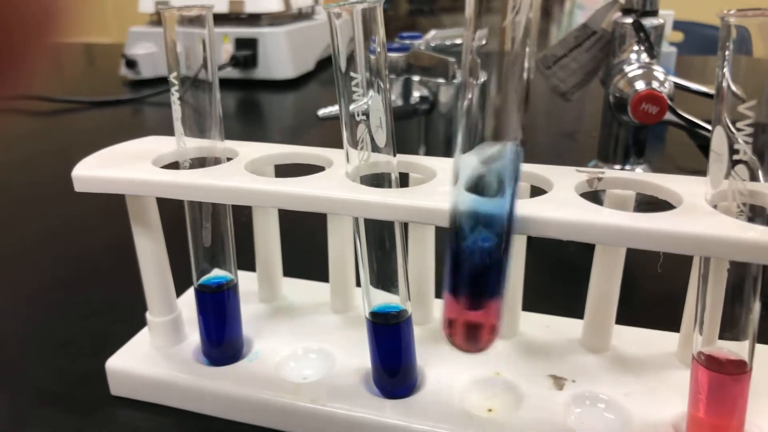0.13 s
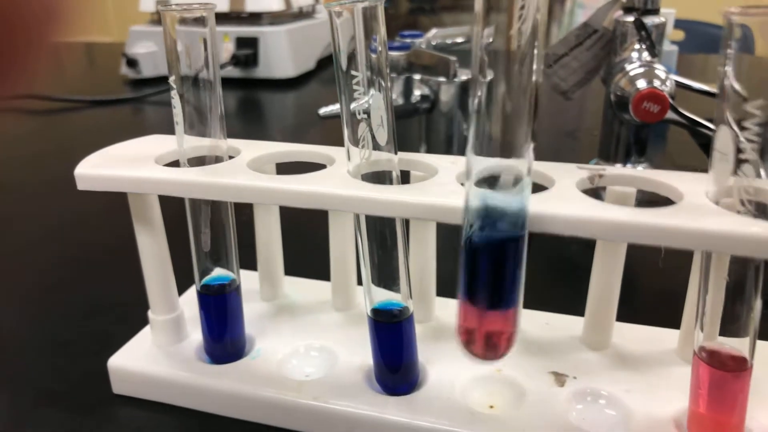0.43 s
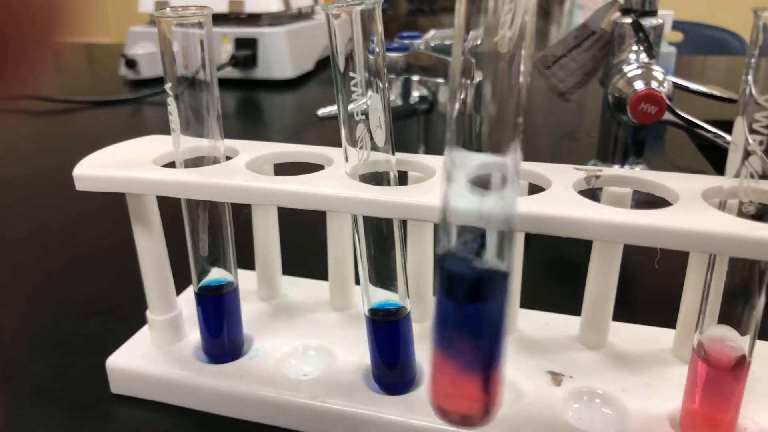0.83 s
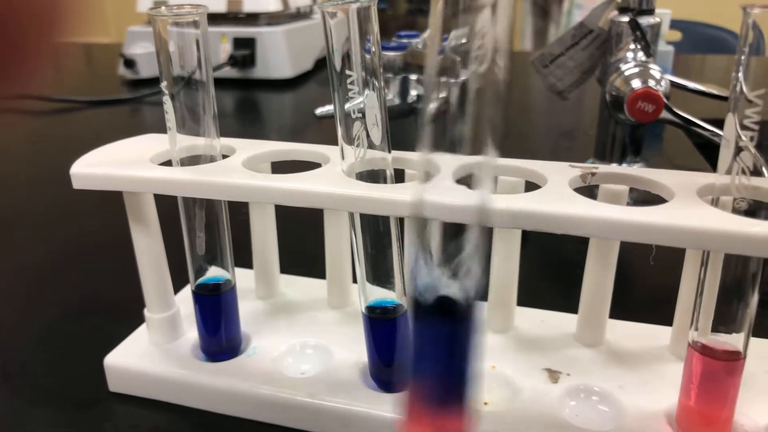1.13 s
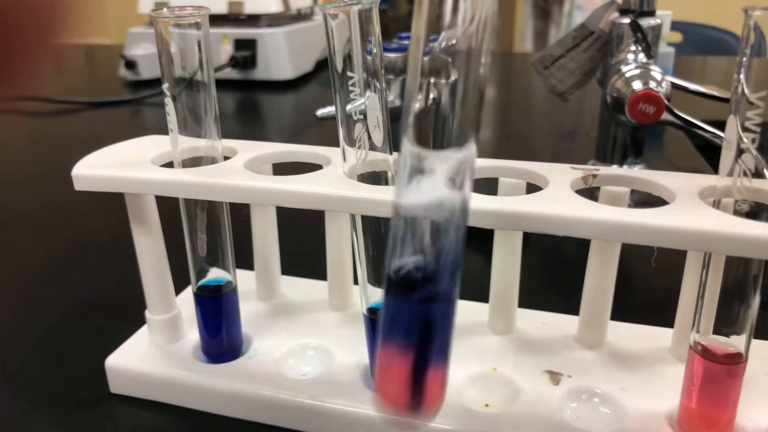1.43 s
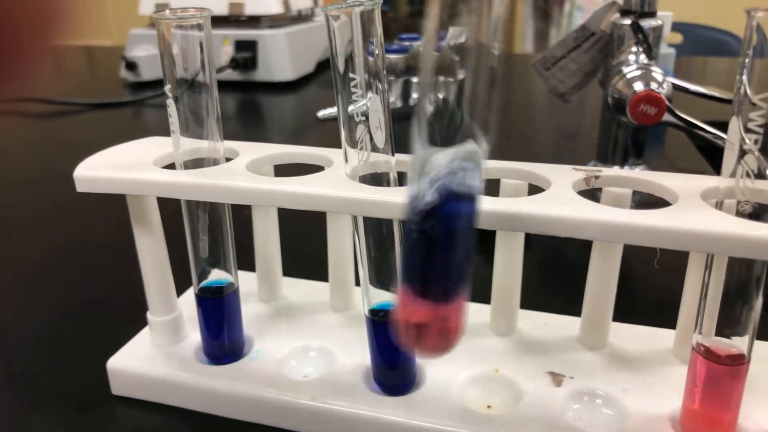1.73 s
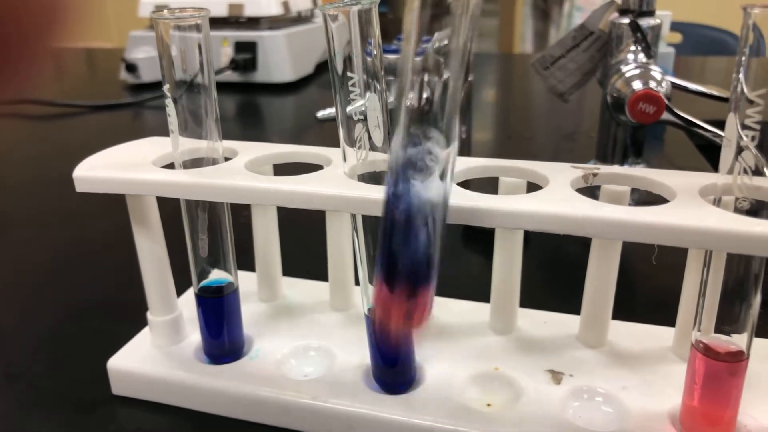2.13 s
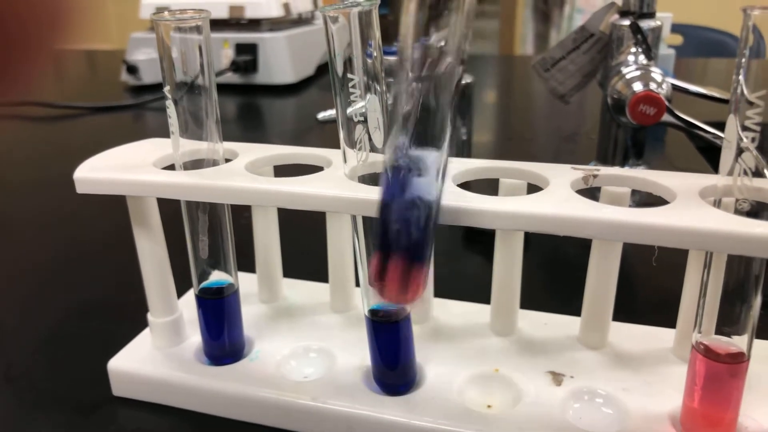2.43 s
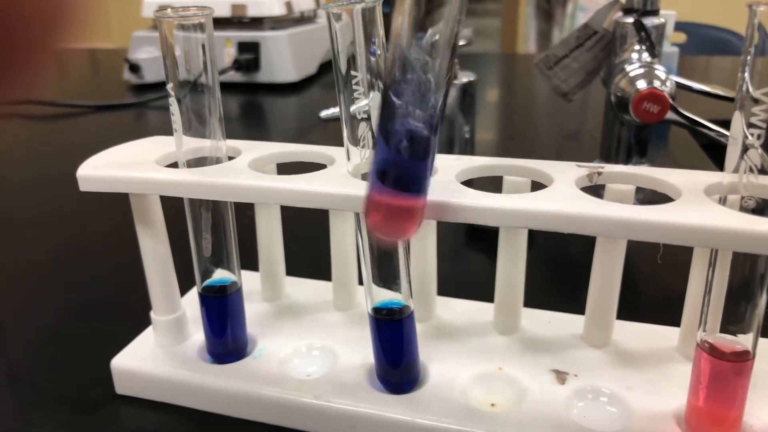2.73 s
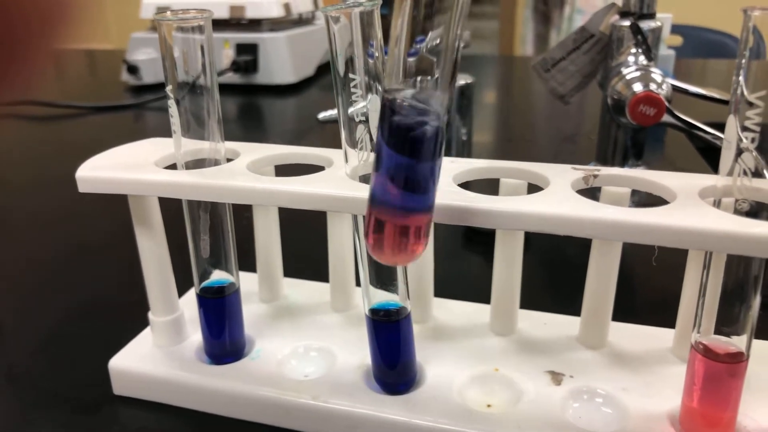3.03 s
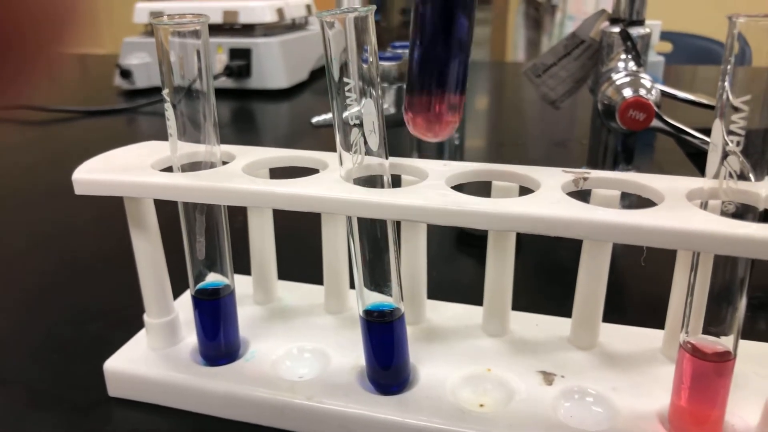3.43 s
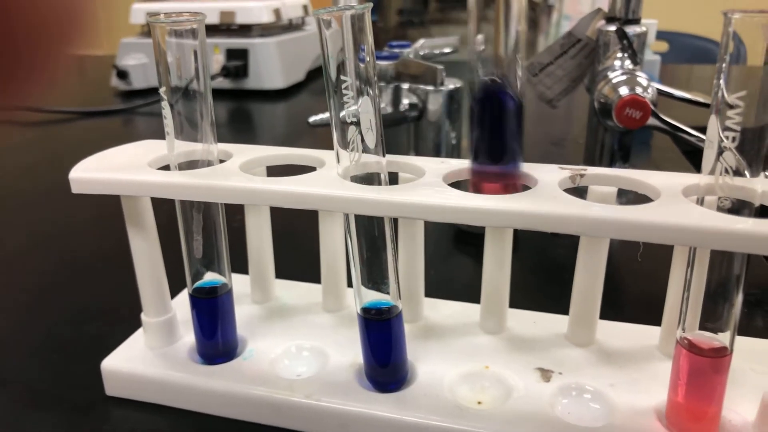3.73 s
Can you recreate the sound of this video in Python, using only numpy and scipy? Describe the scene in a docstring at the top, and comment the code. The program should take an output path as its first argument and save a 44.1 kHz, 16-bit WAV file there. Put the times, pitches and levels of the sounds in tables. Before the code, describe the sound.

A quick burst of glass-on-plastic clatter in the first second, fading into steady lab hum

```python
"""Glass test tube shaken in a plastic rack

Strokes up and down: the first hit the rack, later ones only graze it. Mains hum and ventilation fill the lab.
Glass: noise crack plus damped bending modes. Rack: spreading noise clack plus modes, then rattles on the bench.
Bench: low modes. Grazes: narrow noise ticks. Room: decaying noise tail. Background: sines and coloured noise."""
import sys
import numpy as np
from scipy import signal
from scipy.fft import rfft, irfft, next_fast_len
from scipy.io import wavfile
from scipy.ndimage import uniform_filter1d, map_coordinates

SR = 44100
rng = np.random.default_rng(int(sys.argv[2]) if len(sys.argv) > 2 else 0)


def wrap_up_sound(samples):
    """Save the sound to the file named by the first command line argument, as 16-bit audio."""
    columns = np.atleast_2d(samples).T
    # keep every value between -1 and 1, then stretch to whole-number steps
    tamed = np.clip(columns, -1, 1)
    steps = np.round(tamed * 32767).astype(np.int16)
    wavfile.write(sys.argv[1], SR, steps)


N = 171990  # samples


def amp(db):
    """Decibels to gain."""
    return 10 ** (np.asarray(db) / 20)


def along(points, hz):
    """(f/Hz, value) points interpolated on a log frequency axis."""
    f, v = np.transpose(points)
    return np.interp(np.log(hz + 1), np.log(f + 1), v)


def below(hz, edge_hz):
    """Soft step: near 1 well under the edge, 1/2 at it, near 0 well over it."""
    return 1 / (1 + (hz / edge_hz) ** 4)


def filtered(x, response):
    """Multiply the spectrum of x by a response of frequency."""
    m = next_fast_len(len(x) + 8192)
    hz = np.fft.rfftfreq(m, 1 / SR)
    return irfft(rfft(x, m) * response(hz), m)[:len(x)]


def coloured(x, gain_db):
    """Causal minimum-phase filter with a gain in dB as a function of frequency."""
    m = 2 * len(x)
    cepstrum = irfft(np.log(amp(gain_db(np.fft.rfftfreq(m, 1 / SR)))))
    # fold the cepstrum onto positive time
    cepstrum[1:m // 2] *= 2
    cepstrum[m // 2 + 1:] = 0
    return irfft(rfft(x, m) * np.exp(rfft(cepstrum)))[:len(x)]


def evened(x, size=400):
    """Flatten the broad chance peaks of a noise burst's spectrum."""
    z = rfft(x, 2 * len(x))
    power = np.abs(uniform_filter1d(np.abs(z) ** 2, 2 * size))
    return irfft(z / np.sqrt(power + 1e-12))[:len(x)]


def hit_time():
    """Time axis of one contact, s."""
    return np.arange(16384) / SR


def blow(x):
    """Scale to the energy of 24 ms at unit RMS."""
    return x * np.sqrt(.024 * SR / (np.sum(x ** 2) + 1e-20))


def dying(t60s, order=128):
    """Noise in which each frequency decays at its own rate; t60s: f/Hz, t60/s."""
    t = hit_time()
    hz, s, z = signal.stft(rng.standard_normal(len(t)), SR, nperseg=order)
    decay = amp(-60 * s / along(t60s, hz)[:, None])
    noise = signal.istft(z * decay, SR, nperseg=order)[1]
    return evened(noise[:len(t)], size=160)


def wobble(rate, size=N):
    """Smooth random curve, rate knots/s."""
    knots = rng.standard_normal(256)
    return map_coordinates(knots, [np.arange(size) * rate / SR], mode="mirror")


def add(track, s, sound):
    """Mix a sound in at s seconds."""
    part = track[round(s * SR):][:len(sound)]
    part += sound[:len(part)]


RISE_CYCLES, SCATTER_DB = 2, 1  # build-up time constant; level spread of a mode per blow


def ring(modes, delay=lambda hz: 0, tilt_db=lambda hz: 0, length=1):
    """Damped modes building up over a few cycles, level and phase random at each blow."""
    out = 0
    draws = rng.standard_normal((len(modes), 2))
    for (hz, db, t60), (size, phase) in zip(modes, draws):
        t = np.maximum(hit_time() - delay(hz), 0)
        decay = amp(-60 * t / (t60 * length))
        rise = 1 - np.exp(-t * hz / RISE_CYCLES)
        wave = np.sin(2 * np.pi * (hz * t + phase)) * decay * rise
        out = out + amp(db + SCATTER_DB * size + tilt_db(hz)) * blow(wave)
    return out


# tube meets rack: t/s, crack level/dB, rack level/dB, low body boost/dB,
# low, high and top glass ring level/dB, ring t60 factor/x
TUBE_STRIKES = [(0.1023, -49.5, -42, 3, -82, -61.5, -86, 1),
                (0.2173, -28.5, -23.5, -0.5, -40.5, -36, -54, 0.84),
                (0.3914, -32, -26.5, -3, -55, -37, -56, 1.2),
                (.5306, -27.5, -23.5, -1, -43, -36.5, -57, .7),
                (0.5408, -38, -31.5, -1.5, -54, -56, -61, .7), (0.6966, -75, -49.5, 7, -65, -82, -73, 1.3),
                (0.7057, -31, -26.5, -6.5, -36, -38.5, -45, 0.66),
                (0.7565, -57, -35.5, -4, -40.5, -79, -55, 0.85),
                (0.7898, -66.5, -51, -13, -66, -86, -68, 0.94),
                (.9185, -80, -70.5, 4, -68, -87.5, -80.5, 0.41),
                (1.6130, -80, -58.5, -1.5, -73.5, -97, -97, 0.55),
                (1.9804, -84, -75, 5, -93.5, -69.5, -85, 1.2),
                (2.6213, -81, -53.5, -5.5, -90, -73, -79, 0.96),
                (3.7201, -69, -53, 3, -68.5, -82, -85, 1.3), (3.8680, -73, -66, 3, -76, -83, -88, 1)]


def strikes():
    """Each strike: hard crack, clack spreading through the rack, ring of the glass."""
    out = np.zeros(N)
    for s, crack_db, rack_db, body_db, *rings_db, length in TUBE_STRIKES:
        sound = amp(crack_db) * crack() + amp(rack_db) * rack(body_db)
        add(out, s, sound + glass(rings_db, length))
    return out


# spectrum of the glass contact noise: f/Hz, level/dB
CRACK_COLOUR = [(60, -43.5), (400, -16), (1400, 0), (3000, 1), (4200, -7.5), (5350, 11), (6700, -4.5),
                (7900, 2.5), (10200, -7), (11200, 0.5), (12400, -8.5), (13400, 5), (16000, -7.5)]
CRACK_T60_S, CRACK_RISE_S = .0055, .0003


def crack():
    """Hard glass contact: a noise burst with fast rise and decay."""
    t = hit_time()
    envelope = amp(-60 * t / CRACK_T60_S) * (1 - np.exp(-t / CRACK_RISE_S))
    burst = evened(rng.standard_normal(len(t)) * envelope)
    return blow(coloured(burst, lambda hz: along(CRACK_COLOUR, hz)))


TRAVEL_S = .003  # bending-wave delay near 1 kHz


def travel(hz):
    """Delay of a bending wave through the plastic, s: higher frequencies arrive sooner."""
    return TRAVEL_S * np.sqrt(1000 / (hz + 50))


# modes of the plastic rack: f/Hz, level/dB, t60/s
RACK_MODES = [(543, -11, 0.091), (607.6, -9.5, 0.079), (657.3, -6, 0.065), (719, -10.5, .06),
              (767, -5.5, 0.047), (811.5, -6.5, .06), (862, -10, .075), (1038, -10, 0.061),
              (1424, -16, 0.11), (1800, -8, .04), (1935, -13, 0.042), (2261, -5, 0.013),
              (2536, -19.5, 0.051), (2873, -19, 0.031), (3150, -21, 0.016)]
# spectrum of the rack contact noise: f/Hz, level/dB
CLACK_COLOUR = [(40, -43.5), (150, -24), (300, -11.5), (430, -9), (700, 3.5), (1000, -4.5), (1300, -3),
                (1550, -5), (2200, 5), (2750, -19), (3100, -10.5), (4000, -21.5), (5200, -16), (6500, -30),
                (14000, -27.5)]
# decay of the rack contact noise: f/Hz, t60/s
CLACK_DECAY = [(300, 0.09), (800, 0.061), (2200, 0.023), (5000, 0.11), (14000, 0.027)]
CLACK_DB, MODES_DB, BODY_HZ = -3, -3, 1210


def rack(body_db):
    """Struck plastic: noise and modes dispersed by bending waves, low body boosted by body_db."""
    body = lambda hz: body_db * below(hz, BODY_HZ)
    # integrating the delay over frequency gives the phase
    spread = lambda hz: np.exp(-2j * np.pi * np.cumsum(travel(hz)) * hz[1])
    clack = blow(coloured(dying(CLACK_DECAY), lambda hz: along(CLACK_COLOUR, hz)))
    clack = filtered(clack, lambda hz: amp(body(hz)) * spread(hz))
    return amp(CLACK_DB) * clack + amp(MODES_DB) * ring(RACK_MODES, travel, body)


# bending modes of the tube, three groups: f/Hz, level/dB, t60/s
LOW_MODES = [(5430, -9.5, 0.22), (5270, 2.5, 0.058)]
HIGH_MODES = [(11490, 0.0036, 0.066)]
TOP_MODES = [(13230, -8.5, .05), (14300, -2, .08), (14150, -10, .06), (14700, -3.5, .08)]
FLUTTER_DB, FLUTTER_KNOTS_PER_S = 3, 84


def glass(levels_db, length=1):
    """Three groups of tube modes, each wavering in level as the tube moves."""
    size = len(hit_time())
    out = np.zeros(size)
    for modes, db in zip((LOW_MODES, HIGH_MODES, TOP_MODES), levels_db):
        flutter_db = FLUTTER_DB * wobble(FLUTTER_KNOTS_PER_S, size)
        out += amp(db + flutter_db) * ring(modes, length=length)
    return out


# rack knocks on the bench: t/s, level/dB, treble boost/dB
RACK_RATTLES = [(.2293, -34, -0.5), (.2425, -31, -7), (.2492, -38, 3), (.2517, -27.5, 0), (.2622, -37, 3),
                (0.303, -57, -2), (.4085, -33.5, -18.5), (0.4183, -34, -14.5), (.4212, -27.5, -2),
                (.4513, -44, 2), (.5408, -30.5, -0.5), (.5642, -27.5, -3.5), (0.5914, -47, -4),
                (.6170, -61, 1), (0.714, -42.5, 1.5), (.7288, -46, 13), (.7328, -43, 5), (.7757, -43.5, -5),
                (.9745, -90.5, -5.5), (3.782, -60.5, -12)]
# spectrum of the knock noise: f/Hz, level/dB
RATTLE_COLOUR = [(200, -24.5), (430, -11.5), (600, 1.5), (780, 3.5), (1000, -4), (1300, -1.5), (1550, -7.5),
                 (2100, -5.5), (2750, -9), (3700, -12.5), (5000, -12), (6200, -27.5), (11000, -39),
                 (16000, -38.5)]
# decay of the knock noise: f/Hz, t60/s
RATTLE_DECAY = [(300, .05), (800, 0.037), (2200, 0.018), (5000, 0.018), (14000, .012)]
RATTLE_DB, RATTLE_MODES_DB, TREBLE_HZ = -2, -8, 3000


def rattles():
    """The jolted rack drops back on the bench: decaying noise knocks plus rack modes."""
    out = np.zeros(N)
    for s, db, treble_db in RACK_RATTLES:
        treble = lambda hz: treble_db * (1 - below(hz, TREBLE_HZ))
        knock = blow(coloured(dying(RATTLE_DECAY), lambda hz: along(RATTLE_COLOUR, hz) + treble(hz)))
        add(out, s, amp(db) * (amp(RATTLE_DB) * knock + amp(RATTLE_MODES_DB) * ring(RACK_MODES)))
    return out


# thumps of the hardest strikes: t/s, level/dB
BENCH_THUMPS = [(.2250, -33.5), (.5400, -37), (.7130, -49)]
# modes of the bench top: f/Hz, level/dB, t60/s
BENCH_MODES = [(233, -2, 0.031), (289, -3.5, 0.051), (353, 1.5, .05), (462.7, -0.5, 0.035)]


def thumps():
    """The bench top under the rack answers with low, short modes."""
    out = np.zeros(N)
    for s, db in BENCH_THUMPS:
        add(out, s, amp(db) * blow(ring(BENCH_MODES)))
    return out


# contacts that only set the glass singing: t/s, low, high and top ring level/dB
SOFT_TOUCHES = [(.2500, -43.5, -78, -56), (0.476, -69, -85, -74), (0.557, -45, -75, -66),
                (0.612, -56.5, -81, -78), (.9740, -85, -90, -92), (3.7540, -72, -82, -88),
                (3.8130, -79, -77, -97)]


def touches(rise_s=.002):
    """Soft contacts swell the glass ring without a click."""
    out = np.zeros(N)
    for s, *rings_db in SOFT_TOUCHES:
        add(out, s, glass(rings_db) * (1 - np.exp(-hit_time() / rise_s)))
    return out


# glass brushing the rim of the hole: t/s, level/dB, centre f/Hz, width/octaves
RIM_GRAZES = [(1.4788, -74, 4280, 0.14), (1.9808, -62.5, 15170, 0.066), (2.0080, -75, 3960, 0.12),
              (2.302, -76.5, 11600, 0.038), (2.6220, -65.5, 10800, 0.25), (3.3510, -82, 14910, .06),
              (3.627, -63, 5390, 0.13), (3.659, -73, 9420, 0.6)]


def grazes(t60_s=0.012, rise_s=.0006):
    """Tube brushing past: tiny narrow-band noise ticks."""
    out, t = np.zeros(N), hit_time()
    envelope = amp(-60 * t / t60_s) * (1 - np.exp(-t / rise_s))
    for s, db, centre_hz, width in RIM_GRAZES:
        band = lambda hz: np.exp(-.5 * (np.log2((hz + 1) / centre_hz) / width) ** 2)
        hiss = filtered(rng.standard_normal(len(t)), band)
        add(out, s, amp(db) * blow(hiss * envelope))
    return out


# decay of the room: f/Hz, t60/s
ROOM_DECAY = [(200, 0.31), (800, 0.23), (2200, 0.28), (6000, 0.16), (15000, 0.15)]
# spectrum of the room tail: f/Hz, level/dB
ROOM_TAIL_COLOUR = [(200, -12.5), (800, -13.5), (2200, -18), (6000, -26), (15000, -22), (16300, -39.5)]


def room(x, delay_s=.008):
    """Short lab reverberation: convolution with a delayed, decaying noise tail."""
    tail = dying(ROOM_DECAY)
    tail = coloured(tail / np.linalg.norm(tail), lambda hz: along(ROOM_TAIL_COLOUR, hz))
    return signal.fftconvolve(np.pad(x, (round(delay_s * SR), 0)), tail)[:N]


# mains hum before trim and waver: t/s, level/dB
HUM_LEVELS = [(0.0, -40), (0.03, -39.5), (0.38, -38), (0.42, -44), (0.5, -36.5), (0.57, -42), (1.39, -43.5),
              (1.5, -39.5), (1.7, -44.5), (2.0, -42.5), (2.08, -47.5), (2.39, -40.5), (2.53, -46.5),
              (2.8, -39.5), (3.12, -44.5), (3.18, -42), (3.5, -44.5), (3.88, -39)]
HUM_HZ, HUM_TRIM_DB, HUM_WAVER_DB = 120.05, -0.5, -0.5


def mains_hum(t):
    """One sine whose level follows a curve plus a slight random waver."""
    level_db = np.interp(t, *np.transpose(HUM_LEVELS)) + HUM_TRIM_DB
    return amp(level_db + HUM_WAVER_DB * wobble(14)) * np.sin(2 * np.pi * HUM_HZ * t)


# fans and motors: f/Hz, mean level/dB
MACHINE_TONES = [(91.2, -67.5), (172, -61), (222, -63), (233, -69), (271, -69), (343, -70), (360.3, -68.5),
                 (443.5, -76.5), (8000, -88.5)]


def machine_tones(t, waver_db=4.5, drift_rad=.5):
    """Fans and motors: weak sines wavering in level and phase."""
    out = np.zeros(N)
    for hz, db in MACHINE_TONES:
        level = amp(db + waver_db * wobble(5.12))
        out += level * np.sin(2 * np.pi * (hz * t + rng.random()) + drift_rad * wobble(5))
    return out


# ventilation spectrum, relative: f/Hz, level/dB
AIR_COLOUR = [(20, -52.5), (40, -28.5), (85, -17.5), (140, -12), (190, -20.5), (235, -17.5), (300, -17),
              (360, -19.5), (410, -27), (520, -32), (900, -37.5), (1440, -38.5), (2080, -30), (2600, -39.5),
              (3500, -48.5), (6000, -52), (9000, -57), (16000, -58.5)]
AIR_RMS_DB, AIR_TOP_HZ = -53.5, 15800


def ventilation():
    """Rush of air: steady coloured noise."""
    air = filtered(rng.standard_normal(N), lambda hz: amp(along(AIR_COLOUR, hz)) * (hz < AIR_TOP_HZ))
    return amp(AIR_RMS_DB) * air / air.std()


def background():
    """Hum, machine tones and ventilation; sqrt(2) turns the sines' levels into RMS."""
    t = np.arange(N) / SR
    return np.sqrt(2) * (mains_hum(t) + machine_tones(t)) + ventilation()


def scene():
    """Tube and rack close by, in the humming room."""
    near = strikes() + rattles() + thumps() + touches() + grazes()
    return (near + room(near) + background())[None]


TOP_HZ = 16200


def record(dry):
    """Steep low-pass at the band limit."""
    low_pass = lambda hz: 1 / (1 + (hz / TOP_HZ) ** 110)
    return np.array([filtered(channel, low_pass) for channel in dry])


dry = scene()
out = record(dry)
wrap_up_sound(out)
```